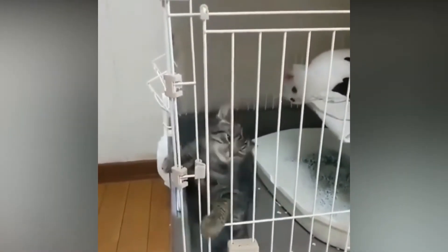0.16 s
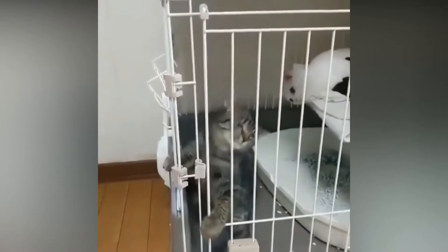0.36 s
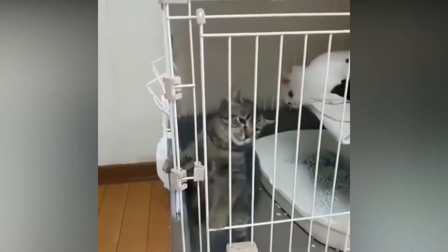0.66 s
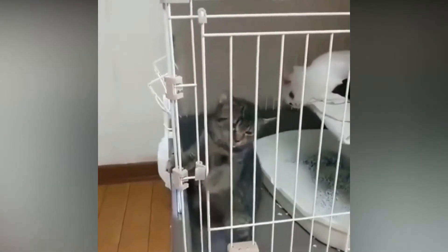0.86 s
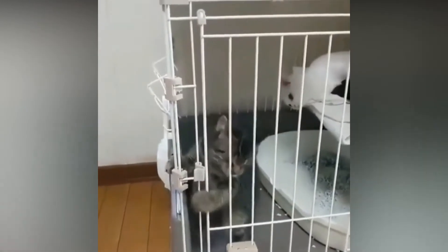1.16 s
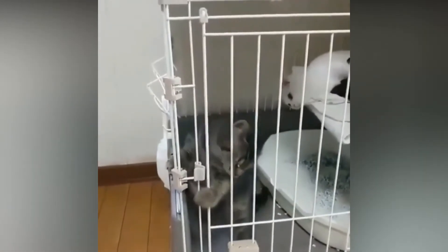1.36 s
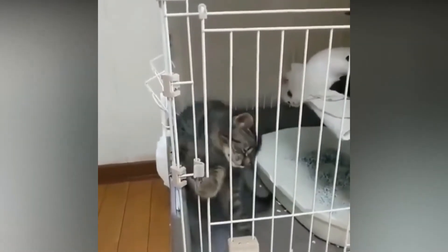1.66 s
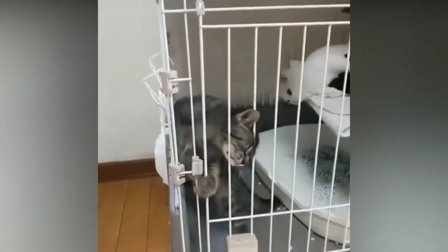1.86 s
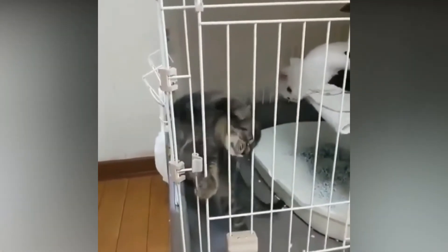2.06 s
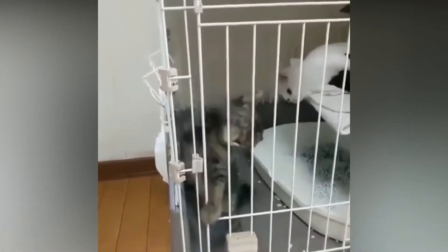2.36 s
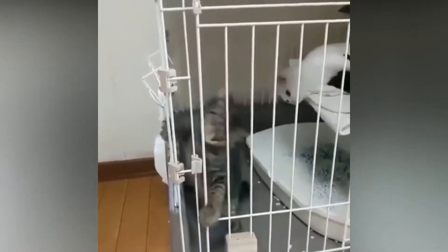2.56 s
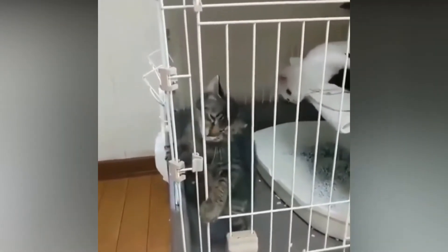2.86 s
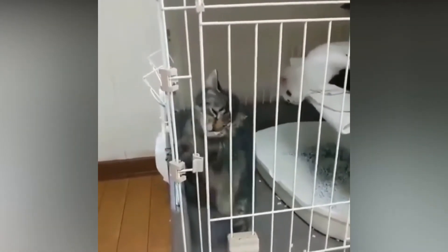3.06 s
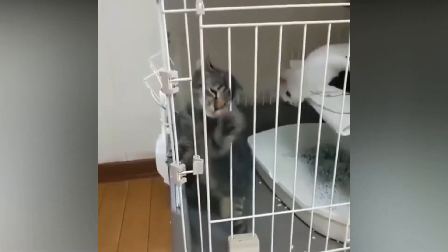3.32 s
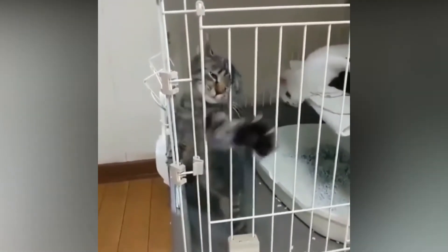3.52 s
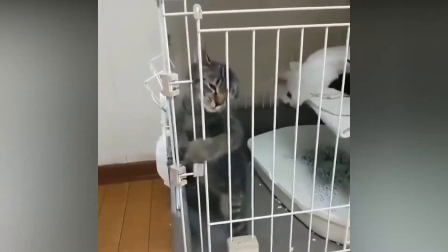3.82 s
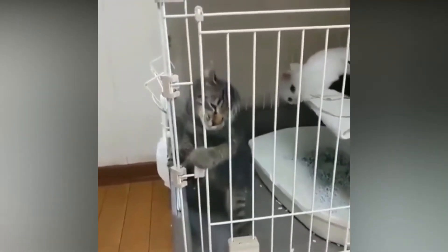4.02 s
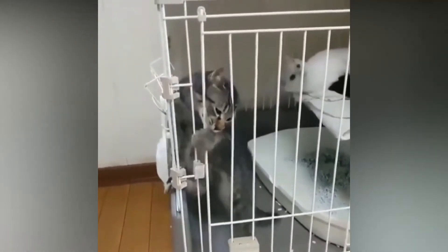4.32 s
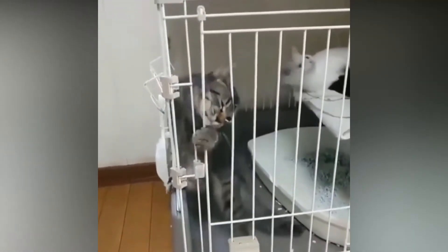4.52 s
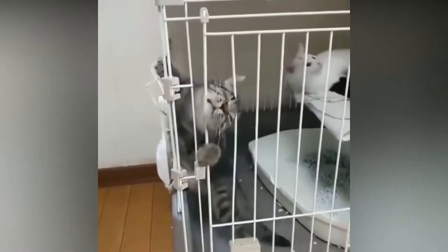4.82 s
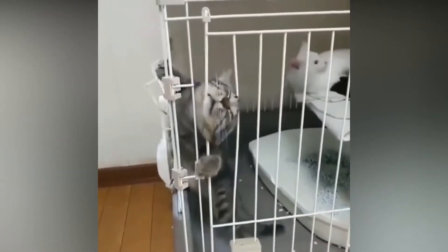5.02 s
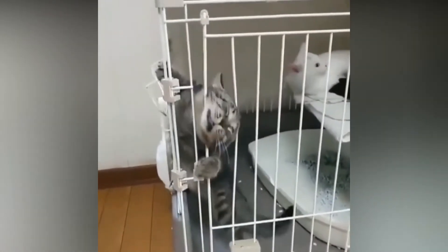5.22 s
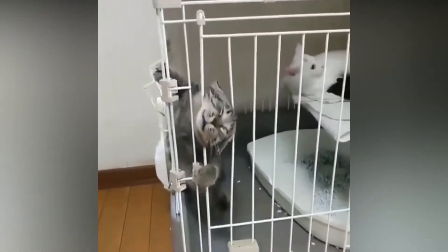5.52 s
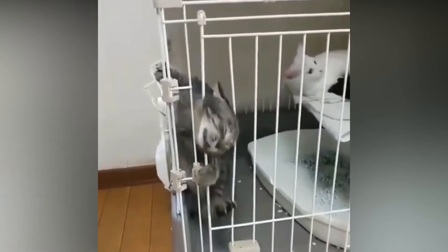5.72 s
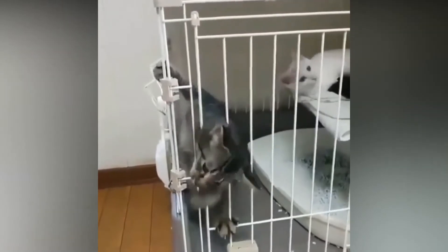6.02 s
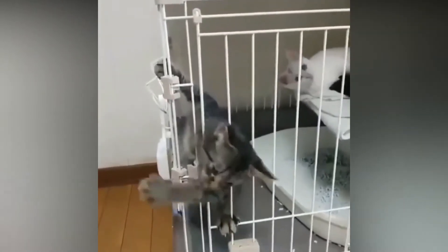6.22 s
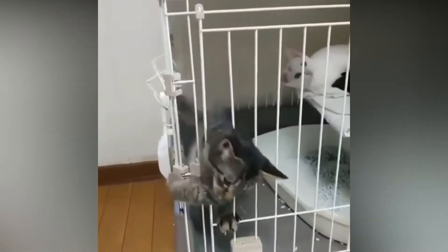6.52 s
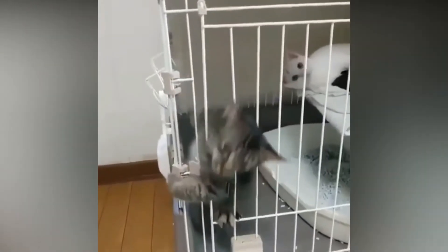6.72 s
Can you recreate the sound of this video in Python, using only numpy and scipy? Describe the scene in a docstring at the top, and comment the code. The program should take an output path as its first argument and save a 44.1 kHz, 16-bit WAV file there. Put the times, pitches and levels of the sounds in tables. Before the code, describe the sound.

In a small quiet room, a kitten's paws knock a wire cage. Soft hollow bumps and sparse clicks come first, then firmer knocks with tray thumps. A sharp clinking burst near four seconds leads to a dense, bright clatter with singing bars just before five. After a lull, a hard clank and deep thump land at six, then a padded bump. Mono, fairly close, with low hum and faint hiss.

```python
"""Kitten on a wire cage

A kitten paws at and climbs a wire pet cage in a small quiet room, heard in mono over a low hum and hiss.
Contacts shake frame, bars, loose door and hard parts, each noise plus decaying sines, often with a short rattle.
Steps and pushes thump the plastic tray as low sines; wires ping, panels bump and long bars sing as beating sines.
Hard parts snap as short noise bursts, and the room answers with noise echoes that die band by band."""
import sys
import numpy as np
from scipy import signal
from scipy.fft import rfft, irfft, next_fast_len
from scipy.io import wavfile

SR = 44100
rng = np.random.default_rng(int(sys.argv[2]) if len(sys.argv) > 2 else 0)


def int16_out(signal):
    """Quantize to a 16-bit WAV file."""
    q = np.round(np.clip(np.atleast_2d(signal).T, -1, 1) * 32767)
    wavfile.write(sys.argv[1], SR, q.astype(np.int16))


N = 303406

# paws and claws meet the cage; a padded paw stirs mainly the frame, metal on metal also the door and the ticks;
# the four levels are of the attack, ahead of each part's trim:
# (t/s, frame level/dB, bars level/dB, door level/dB, ticks level/dB, rattle length/s)
CONTACTS = [(0.032, -46, -60, -65, -68, 0.034), (0.084, -40.5, -40.5, -47, -52.5, 0.0051),
            (0.1, -44.5, -67, -72, -68, 0.0045), (0.229, -55, -54, -60, -65, 0),
            (.774, -52.5, -55, -45.5, -48.5, 0.003), (0.878, -48.5, -49, -52.5, -50, 0.0031),
            (0.903, -49, -59, -77, -77, .03), (0.952, -56, -77, -81, -77, 0),
            (0.986, -63, -79, -80, -79, 0.0047), (1.209, -53, -47, -48.5, -46.5, 0.0024),
            (1.233, -46, -51, -78, -78, 0), (1.544, -49, -50, -63, -59, 0.004),
            (1.6, -40, -42.5, -54, -57, 0), (1.61, -40.5, -54, -67, -75, 0.019),
            (1.654, -46.5, -55.5, -54.5, -60.5, 0.018), (1.715, -47.5, -51.5, -63, -65, 0),
            (1.943, -44.5, -54.5, -65, -60, 0), (2.006, -66, -59, -72, -82, 0.02),
            (2.289, -44.5, -56, -65, -67, 0.0019), (2.562, -54.5, -73, -73, -75, 0.03),
            (2.609, -57, -71.5, -77, -75, .03), (2.657, -47, -55, -60, -66, 0.022),
            (2.722, -53, -62, -72, -77, 0), (3.215, -38, -44, -54, -50, .014),
            (3.249, -39, -44, -49, -55, 0), (3.8657, -42.5, -39.5, -41.5, -47, 0.004),
            (3.876, -41.5, -41, -49, -45, 0.0045), (3.914, -40, -45, -43.5, -47, 0.0033),
            (3.981, -43, -46, -48, -50, 0), (4.005, -42.5, -46, -50.5, -56, 0),
            (4.015, -48.5, -49.5, -52, -61, .008), (4.072, -47.5, -64, -58, -63, 0.0012),
            (4.35, -46.5, -68, -68, -79, 0), (4.449, -48.5, -58.5, -68, -68, 0.025),
            (4.518, -42.5, -54, -55, -62, .002), (4.537, -36, -45.5, -53, -50, 0.005),
            (4.557, -40.5, -51, -59, -62, .022), (4.65, -41, -51.5, -48.5, -53, 0.012),
            (4.751, -36.5, -40.5, -40.5, -43, 0.011), (4.768, -33, -40, -44, -45, .004),
            (4.783, -41, -37, -41.5, -41.5, 0.007), (4.796, -35, -42, -41, -47, 0.008),
            (4.82, -38, -43.5, -44, -51, .004), (4.833, -40, -38.5, -46, -51, .003),
            (4.861, -30.5, -34.5, -45, -39, 0.0035), (4.878, -31.5, -34.5, -37, -45, 0),
            (4.911, -42, -41, -48, -55, .005), (4.938, -37, -46, -42, -45.5, 0.00094),
            (4.945, -43, -37, -40, -45, 0.004), (4.956, -40, -37, -42, -49, .003),
            (5.064, -49, -52.5, -62, -77, 0.01), (5.227, -45.5, -49, -60, -75, 0.0093),
            (5.301, -51.5, -57.5, -78.5, -77, 0.0018), (5.341, -50, -65, -73, -75, 0.00079),
            (5.975, -42, -42, -46, -52, 0), (5.981, -34.5, -34.5, -38, -46.5, 0.0039),
            (6.016, -38.5, -46, -54, -54, 0.0086), (6.047, -40, -46, -48.5, -54, 0.008),
            (6.069, -42, -48, -52.5, -57, .025), (6.196, -48.5, -56.5, -64, -63, 0),
            (6.585, -37, -52, -82, -79, 0.0027), (6.663, -48, -59, -76, -81, .01)]
RING_S, ATTACK_S = .5, .025   # longest sound of one blow; its attack


def from_db(db):
    """Decibels to gain."""
    return 10 ** (np.asarray(db) / 20)


def seconds(length_s):
    """The time of every sample from the start of a sound, in seconds."""
    return np.arange(int(length_s * SR)) / SR


def rms_one(x):
    """Scale to rms 1."""
    return x / np.sqrt(np.mean(x ** 2) + 1e-20)


def attack_one(x):
    """Scale a blow so that its attack has rms 1."""
    return x / np.sqrt(np.mean(x[:int(ATTACK_S * SR)] ** 2) + 1e-20)


def at_hz(points, hz):
    """Read a table on a log-frequency axis."""
    known_hz, values = np.transpose(points)
    return np.interp(np.log(np.maximum(hz, 1)), np.log(known_hz), values)


def decay(t, t60):
    """Fall by 60 dB in t60 seconds."""
    return np.exp(-np.log(1000) * t / t60)


def noise(spectrum, size):
    """Noise with the given spectrum, fading beyond its ends, rms 1."""
    padded = next_fast_len(size)
    hz = np.fft.rfftfreq(padded, 1 / SR)
    below = np.minimum(1, hz / spectrum[0][0])
    above = np.minimum(1, spectrum[-1][0] / (hz + 1))
    gain = from_db(at_hz(spectrum, hz)) * (below * above) ** 2
    white = rfft(rng.standard_normal(padded))
    return rms_one(irfft(white * gain, padded)[:size])


def add(out, s, sound):
    """Mix a sound in from time s."""
    start = int(np.clip(s * SR, 0, N))
    out[start:start + len(sound)] += sound[:N - start]


def background():
    """Low room hum, a thin hiss, and noise strongest near 1.5 and 5 kHz that swells by 1.5 dB each second."""
    # relative spectra: (f/Hz, level/dB per Hz)
    hum_spectrum = [(20, -28), (35, -14.5), (55, 3.5), (75, 5), (100, -0.5), (130, -3.5), (200, -9.5),
                    (300, -13), (400, -15), (470, -11.5), (560, -18.5), (1050, -21.5), (2000, -29),
                    (4000, -41.5)]
    # (f/Hz, level/dB per Hz)
    hiss_spectrum = [(1200, -22), (2500, -12), (4050, -9), (4500, -8.5), (5550, -3.5), (6000, -15),
                     (7300, -8.5), (8100, 2.5), (9000, -2), (10000, -11), (11000, -23), (13000, -21),
                     (15000, -51)]
    # (f/Hz, level/dB per Hz)
    swelling_spectrum = [(1500, 3.5), (3500, -20), (4600, 1.5), (5500, -2.5), (6100, -10.5), (8000, -21)]
    hum = from_db(-49.5) * noise(hum_spectrum, size=N)
    hiss = from_db(-64) * noise(hiss_spectrum, size=N)
    swell = from_db(-76.5 + 1.5 * np.arange(N) / SR)
    return hum + hiss + swell * noise(swelling_spectrum, size=N)


def rattle(length_s):
    """A first touch, then uneven, dying rebounds while loose wires chatter."""
    rebounds_per_s, rebound_db, uneven_db = 300, -1.5, 4.5
    fade_db = -9.5   # from first to last rebound
    length_s = max(length_s, 0)
    count = int(length_s * rebounds_per_s)
    clicks = np.zeros(int(length_s * SR) + 2)
    at = (np.arange(count) + rng.uniform(.3, 1, count)) / rebounds_per_s
    levels_db = rebound_db + fade_db * np.linspace(0, 1, count) + uneven_db * rng.standard_normal(count)
    clicks[(at * SR).astype(int)] = from_db(levels_db)
    clicks[0] = 1
    return clicks


def coloured(crowd, patchy_db, count=26):
    """The spectrum as one point of contact excites it: some groups of modes stronger, some weaker."""
    hz = np.geomspace(crowd[0][0], crowd[-1][0], count)
    return np.column_stack([hz, at_hz(crowd, hz) + patchy_db * rng.standard_normal(count)])


def struck(contacts, levels_db, crowd, modes, modes_db, patchy_db, build_s, t60,
           crack_db, crack_t60, tail_db, tail_t60, detune):
    """One part of the cage; every point of contact weights its modes differently and detunes them a little."""
    pad_s = 0.004   # a fully padded paw takes this much longer than metal to set a part shaking
    t, out = seconds(RING_S), np.zeros(N)
    modes_hz = np.array(modes)[:, :1]
    fades = np.array([from_db(db) * decay(t, ring_s) for hz, db, ring_s in modes])
    # the touched spot cracks, its panel rings, the whole cage shivers on
    crack = from_db(crack_db) * decay(t, crack_t60)
    shiver = from_db(tail_db) * decay(t, tail_t60)
    dying = crack + decay(t, t60) + shiver
    for (s, clicks, softness), db in zip(contacts, levels_db):
        # the shake takes a moment to spread along the wires
        spread = 1 - np.exp(-t / (build_s + pad_s * softness))
        # rebounds land on different spots, so their energies add
        energy = np.abs(signal.fftconvolve((spread * dying) ** 2, clicks ** 2))[:len(t)]
        dense = attack_one(noise(coloured(crowd, patchy_db), size=len(t)) * np.sqrt(energy))
        pitches = modes_hz * (1 + detune * rng.standard_normal(modes_hz.shape))
        rings = fades * np.sin((2 * np.pi * pitches * t).astype(np.float32))
        one_touch = spread * (rng.standard_normal(len(modes)) @ rings)
        clear = attack_one(signal.fftconvolve(one_touch, clicks)[:len(t)])
        add(out, s, from_db(db) * attack_one(dense + from_db(modes_db) * clear))
    return out


def frame(contacts, levels_db):
    """The heavy frame knocks: it starts to shake slowly and rings longest."""
    # crowd of quickly damped modes: (f/Hz, relative level/dB per Hz)
    frame_crowd = [(90, -8), (150, -15), (220, -3), (320, -8), (430, 2), (580, -5.5), (700, -9),
                   (900, -9.5), (1300, -26.5)]
    # clear modes, ahead of weighting and detuning: (f/Hz, relative level/dB, t60/s)
    frame_modes = [(153.1, 2, 0.43), (207.9, 0, 0.52), (294, -7, 0.62), (370.4, 0.5, 0.53), (465, -7, 0.28),
                   (492, -8.5, 0.49), (592.5, -1, 0.22), (677, -10, 0.37), (718, -8.5, 0.46)]
    return struck(contacts, levels_db - 1.3, frame_crowd, frame_modes, modes_db=-7.5, patchy_db=4.0,
                  build_s=0.0037, t60=0.22, crack_db=5.0, crack_t60=0.026, tail_db=-11.0, tail_t60=0.6,
                  detune=0.0082)


def bars(contacts, levels_db):
    """The bars clank in the middle range, lighter and quicker to start than the frame."""
    # crowd of quickly damped modes: (f/Hz, relative level/dB per Hz)
    bar_crowd = [(600, -7.5), (900, 2), (1120, 1.5), (1400, 0.5), (2000, -0.5), (2500, -3.5), (2800, -12.5),
                 (3400, -14.5), (4200, -19)]
    # clear modes, ahead of weighting and detuning: (f/Hz, relative level/dB, t60/s)
    bar_modes = [(946, 3.5, 0.34), (1230, -13, 0.97), (1378, 7, 0.37), (1750, -13, 0.16), (2037, 4, 0.33),
                 (2225, 7.5, 0.19), (2330, -12, 0.47), (2430, -6.5, 0.34)]
    return struck(contacts, levels_db - 2, bar_crowd, bar_modes, modes_db=-9, patchy_db=3.5,
                  build_s=0.0015, t60=0.2, crack_db=0.5, crack_t60=0.013, tail_db=-26, tail_t60=0.76,
                  detune=0.0028)


def door(contacts, levels_db):
    """The loose door chinks in modes around 4 to 5 kHz."""
    # crowd of quickly damped modes: (f/Hz, relative level/dB per Hz)
    door_crowd = [(2700, -38), (3600, -5.5), (4050, 0), (4600, 2.5), (5100, -2.5), (5600, -7), (6100, -20),
                  (7000, -42)]
    # clear modes, ahead of weighting and detuning: (f/Hz, relative level/dB, t60/s)
    door_modes = [(3740, 5, 0.19), (3930, 4, 0.27), (4160, 5, 0.22), (4470, 7, 0.28), (4520, -9, 0.35),
                  (5025, -1, 0.22), (5370, 3, 0.18)]
    return struck(contacts, levels_db - 1.1, door_crowd, door_modes, modes_db=-11.0, patchy_db=4,
                  build_s=0.00037, t60=0.1, crack_db=-8, crack_t60=0.027, tail_db=-12.0, tail_t60=0.36,
                  detune=0.0041)


def ticks(contacts, levels_db):
    """Hard parts tick where they touch: the highest modes, almost at once and soon gone."""
    # crowd of quickly damped modes: (f/Hz, relative level/dB per Hz)
    tick_crowd = [(5600, -21), (6400, 0), (7300, 4.5), (8200, 7.5), (9400, -2.5), (10800, -1), (11600, -24),
                  (13000, -21), (15000, -50)]
    # clear modes, ahead of weighting and detuning: (f/Hz, relative level/dB, t60/s)
    tick_modes = [(7500, 0, 0.18), (7885, 1, 0.17), (8140, 0, 0.15), (8560, 0, 0.14), (8930, 6, .2),
                  (9770, -7, 0.2)]
    return struck(contacts, levels_db - 1.04, tick_crowd, tick_modes, modes_db=-8.0, patchy_db=9.0,
                  build_s=0.00011, t60=0.047, crack_db=-5, crack_t60=0.0056, tail_db=-11.0, tail_t60=0.22,
                  detune=.012)


def cage(rows):
    """All parts share each rattle; heavy ones start later and ring longer."""
    padded_db = 36   # how far the door stays below the frame under a fully padded paw
    times, frame_db, bars_db, door_db, ticks_db, lengths = np.transpose(rows)
    softness = np.clip((frame_db - door_db) / padded_db, 0, 1) ** 2
    contacts = [(s, rattle(length), soft) for s, length, soft in zip(times, lengths, softness)]
    low = frame(contacts, frame_db) + bars(contacts, bars_db)
    return low + door(contacts, door_db) + ticks(contacts, ticks_db)


def light_touches(count=22, uneven_db=3, longest_s=0.011):
    """Paws and fur brush the wires at random moments; rows are laid out like CONTACTS."""
    when, length = rng.random((count, 2)).T
    usual_db = np.array([-60, -68, -75, -78])   # frame, bars, door, ticks
    levels_db = usual_db + uneven_db * rng.standard_normal((count, 1))
    return np.column_stack([when * N / SR, levels_db, length * longest_s])


def tray():
    """Steps, and pushes on the cage, sway the plastic tray for a few cycles in its lowest modes."""
    # the kitten's feet land; a hard landing stirs the upper modes, whose level is a gain on their own:
    # (t/s, main-mode level/dB, upper modes' gain/dB)
    steps = [(.095, -34.5, -8), (.85, -36, 2), (.898, -32.5, -2), (.965, -41.5, 9), (1.227, -34, -7),
             (1.603, -37, 16), (1.667, -33.5, -2), (1.945, -43, 4.5), (2.565, -38.5, -14),
             (3.232, -27, -0.5), (3.27, -35, 6.5), (3.894, -28, -15), (4.388, -32.5, -6), (4.87, -39.5, 12),
             (4.949, -31, -2), (5.452, -36.5, -5), (6.035, -18, -8), (6.596, -28, 0), (6.628, -35.5, -0.5)]
    # deepest, main, then upper modes, ahead of the scatter: (f/Hz, relative level/dB)
    tray_modes = [(60, -9), (88, 0), (158, -13), (210, -10.5)]
    scatter = 0.038   # spread of the pitch from spot to spot, as a share
    swell_s = 0.0077   # time to the fullest sway
    # a push on the cage reaches the tray a moment later and follows a share of its force
    push_lag_s, push_db, usual_force_db, push_follows, push_upper_db = 0.0143, -40.5, -42, 0.89, -5.0
    pushes = [(s + push_lag_s, push_db + push_follows * (frame_db - usual_force_db), push_upper_db)
              for s, frame_db, *_ in CONTACTS]
    t, out = seconds(RING_S), np.zeros(N)
    sway = (t / swell_s * np.exp(1 - t / swell_s)) ** 0.69
    for s, db, upper_db in list(steps) + pushes:
        stiffness = 1 + scatter * rng.standard_normal()
        deepest, main, *upper = [from_db(mode_db) * np.sin(2 * np.pi * hz * stiffness * t)
                                 for hz, mode_db in tray_modes]
        add(out, s, from_db(db) * sway * (deepest + main + from_db(upper_db) * sum(upper)))
    return out


def notes(rows, split, weak_db, release_s, count, sag=0):
    """A mode sounds together with close neighbours, so the note beats; under load its pitch sags."""
    sag_s = 0.0089   # time constant of the sag
    t, out = seconds(RING_S), np.zeros(N)
    turns = np.cumsum(1 - sag * (1 - np.exp(-t / sag_s))) / SR
    for s, db, hz, t60 in rows:
        others_hz = hz * np.exp(split * rng.standard_normal((count, 1)))
        others = np.sin(2 * np.pi * (others_hz * turns + rng.random((count, 1)))).sum(axis=0)
        note = np.sin(2 * np.pi * hz * turns) + from_db(weak_db) * others
        add(out, s, from_db(db) * note * decay(t, t60) * (1 - np.exp(-t / release_s)))
    return out


def pings():
    """A wire slips off a claw and pings: a thin note that starts almost at once."""
    # (t/s, main-tone level/dB, f/Hz, t60/s)
    slips = [(.774, -38.5, 4530, 0.099), (.774, -46, 3830, .05), (1.21, -43, 3950, 0.054),
             (1.424, -55, 4040, .025), (1.459, -58, 4000, .025), (1.492, -54.5, 4030, .025),
             (2.292, -51, 4160, 0.096), (3.866, -41.5, 4166, 0.1), (3.914, -28, 4070, .028),
             (3.914, -51, 4100, 0.18), (3.914, -47, 1435, .14), (3.914, -44, 2218, 0.11),
             (4.006, -39, 4080, .06), (4.006, -40, 1990, 0.065), (4.073, -57.5, 4020, 0.35),
             (4.538, -39.5, 1934, 0.037), (4.566, -44, 1396, .17), (5.982, -36, 3900, 0.055),
             (6.047, -34, 4040, .02), (6.679, -53, 4170, .022)]
    return notes(slips, split=0.022, weak_db=-6.5, release_s=0.00017, count=4)


def snaps():
    """Very short cracks of metal on metal; the harder the contact, the brighter."""
    # (t/s, starting level/dB, brightness/dB per octave)
    cracks = [(.7745, -31.5, -7), (.8795, -45, 2), (1.2084, -49, -2), (3.2155, -34, 2), (3.249, -38, 6),
              (3.866, -33, 8), (3.876, -32.5, -4), (3.9135, -33, -5), (3.981, -35, 6), (4.517, -39.5, -6),
              (4.54, -39, 0), (4.582, -52, -3), (4.749, -32, 2), (4.770, -33, -2), (4.78, -34, -3),
              (4.787, -37, -2), (4.804, -37, -8), (4.820, -35, -2), (4.833, -39, -3), (4.861, -40, 9),
              (4.8645, -31, 3), (4.879, -32, 4), (4.893, -35, -6), (4.912, -43, -5), (4.939, -38, 10),
              (4.956, -30, 5), (4.978, -44, 0), (5.974, -28.5, 7), (5.982, -38, -4), (5.989, -37, 0)]
    # relative spectrum ahead of the brightness tilt: (f/Hz, level/dB per Hz)
    snap_spectrum = [(3200, -8), (4300, 4), (5300, 14.5), (6100, -21), (7200, 3.5), (8200, 8.5), (9400, -2),
                     (10800, -1), (11800, -21), (13000, -21)]
    t, out = seconds(ATTACK_S), np.zeros(N)
    for s, db, brightness_db in cracks:
        spectrum = [(hz, level_db + brightness_db * np.log2(hz)) for hz, level_db in snap_spectrum]
        add(out, s, from_db(db) * noise(spectrum, size=len(t)) * decay(t, t60=0.0089))
    return out


def bumps():
    """A padded paw bumps a panel: a short hollow note that sinks as the paw's weight settles."""
    # (t/s, main-tone level/dB, f/Hz at the start)
    panel_bumps = [(.951, -36, 396), (.987, -37.5, 520), (1.603, -30, 590), (1.717, -29.5, 530),
                   (2.643, -33, 420), (2.657, -38, 380), (2.684, -37, 515), (2.723, -38.5, 510),
                   (4.528, -34, 583), (4.541, -23.5, 575), (4.554, -28, 530), (4.572, -29.5, 487),
                   (5.065, -32.5, 704), (5.236, -35, 522), (5.303, -34, 488), (6.588, -28, 589),
                   (6.597, -33, 466), (6.609, -33, 380), (6.625, -33, 437), (6.666, -38.5, 540),
                   (6.699, -39, 470), (6.732, -42.5, 533), (6.767, -45, 460)]
    t60 = 0.047
    rows = [(s, db, hz, t60) for s, db, hz in panel_bumps]
    return notes(rows, split=0.248, weak_db=-14.0, release_s=0.00067, count=5, sag=0.072)   # sag as a share


def singing_bars():
    """Strong, hard blows set the long bars singing in slowly beating pairs of tones."""
    # (t/s, level/dB)
    blows = [(3.913, -47), (4.779, -38), (4.861, -30.5), (4.947, -45), (5.977, -48)]
    # notes of the long bars: (f/Hz, level under the blow/dB, t60/s)
    bar_notes = [(1766, -11, 0.27), (1991, -1, 0.22), (2350, -13, 0.36), (4570, -7, 0.2),
                 (8000, -10.5, 0.22), (8053, -15, .2)]
    rows = [(s, blow_db + db, hz, t60) for s, blow_db in blows for hz, db, t60 in bar_notes]
    return notes(rows, split=0.0064, weak_db=-1.5, release_s=0.00093, count=1)


def room(x, bass_db=-8, middle_db=-11, treble_db=-14, first_echo_s=0.013):
    """Diffuse reflections that build up and then die band by band."""
    # reverberation: (f/Hz, t60/s)
    room_t60 = [(100, 0.65), (260, 0.57), (700, 1), (1840, 0.4), (4850, 0.27), (10000, 0.35)]
    t, response = seconds(.8), 0
    edges = np.geomspace(45, 14000, 10)
    wet = [(80, bass_db), (500, middle_db), (8000, treble_db)]
    for low, high in zip(edges, edges[1:]):
        hz = np.sqrt(low * high)
        shape = decay(t, at_hz(room_t60, hz)) * (1 - np.exp(-(t / first_echo_s) ** 2))
        echoes = rng.standard_normal(len(t)) * shape / np.linalg.norm(shape)
        band = signal.butter(2, [low, high], "band", fs=SR, output="sos")
        response = response + from_db(at_hz(wet, hz)) * signal.sosfilt(band, echoes)
    return signal.fftconvolve(x, response)[:N]


def scene():
    """The cage and its tray in the room, over the background."""
    touched = cage(np.vstack([CONTACTS, light_touches()]))
    direct = touched + tray() + pings() + snaps() + bumps() + singing_bars()
    return (direct + room(direct) + background())[None]


def record(dry):
    """At the microphone the deepest bass rolls off and the top is cut steeply."""
    low_cut_hz, cutoff_hz = 39, 13300
    low_cut = signal.butter(2, low_cut_hz, "high", fs=SR, output="sos")
    top_cut = signal.ellip(10, .2, 70, cutoff_hz, fs=SR, output="sos")   # .2 dB ripple, 70 dB down above
    return signal.sosfilt(top_cut, signal.sosfilt(low_cut, dry))


dry = scene()
out = record(dry)
int16_out(out)
```